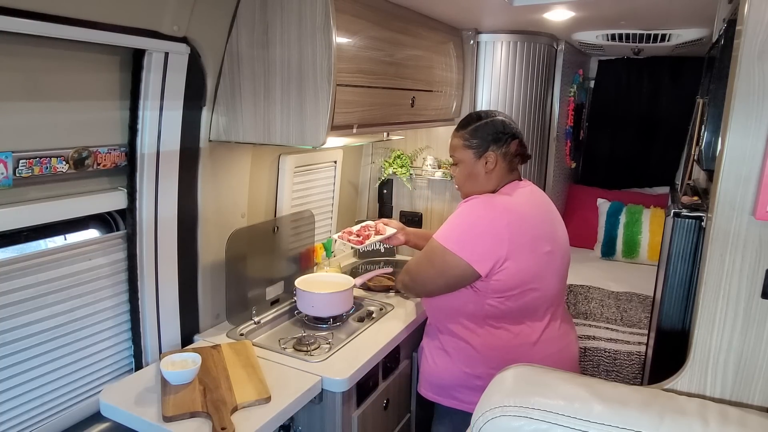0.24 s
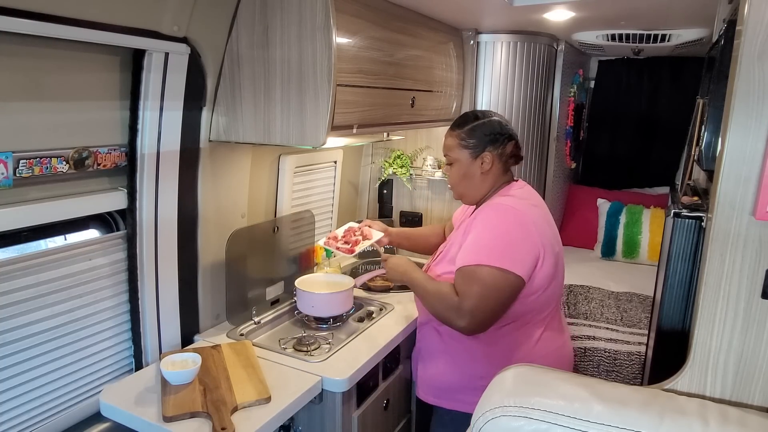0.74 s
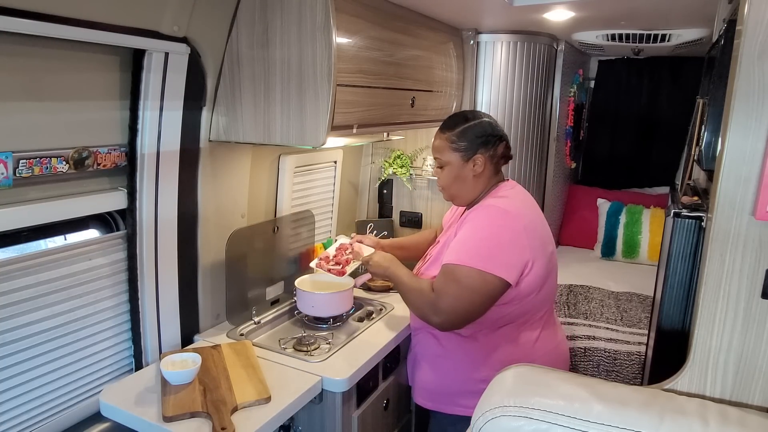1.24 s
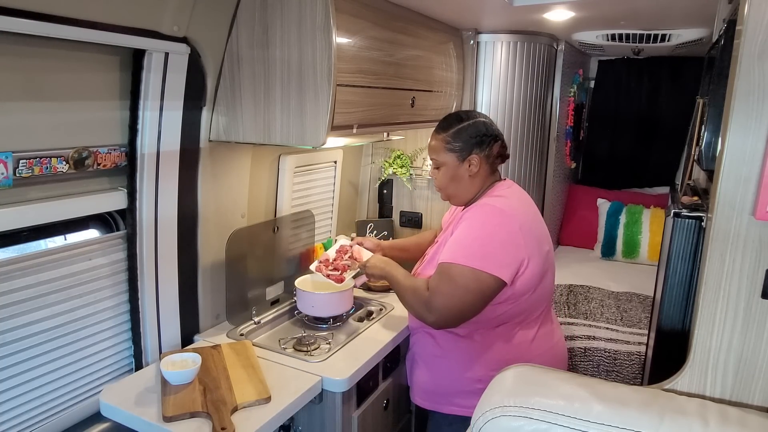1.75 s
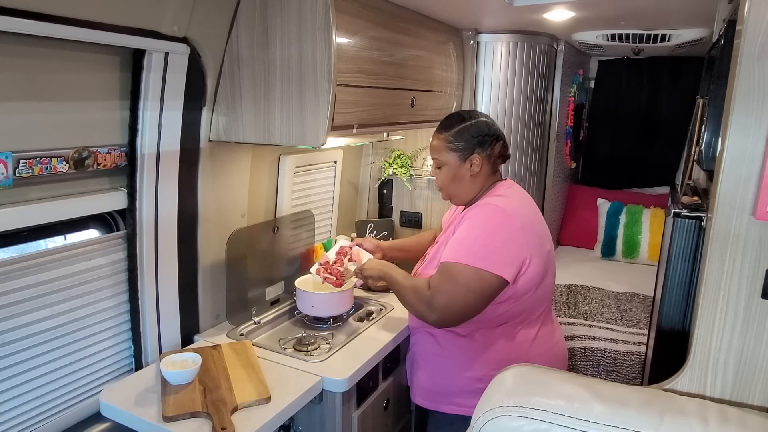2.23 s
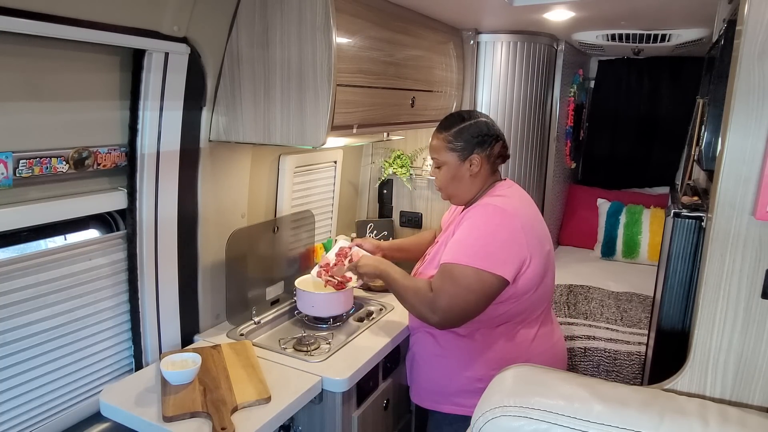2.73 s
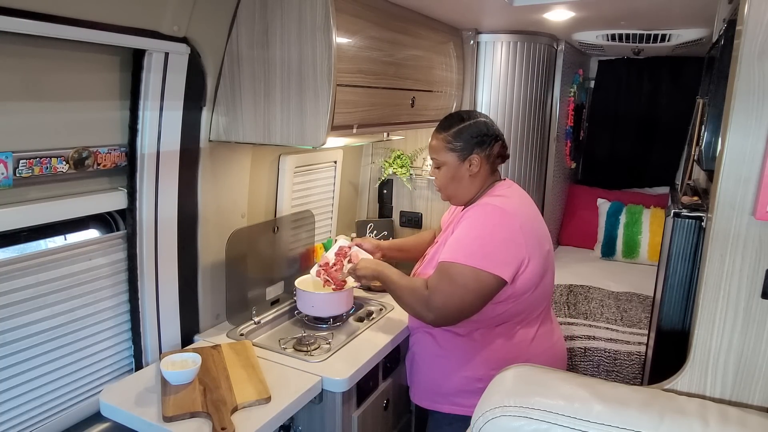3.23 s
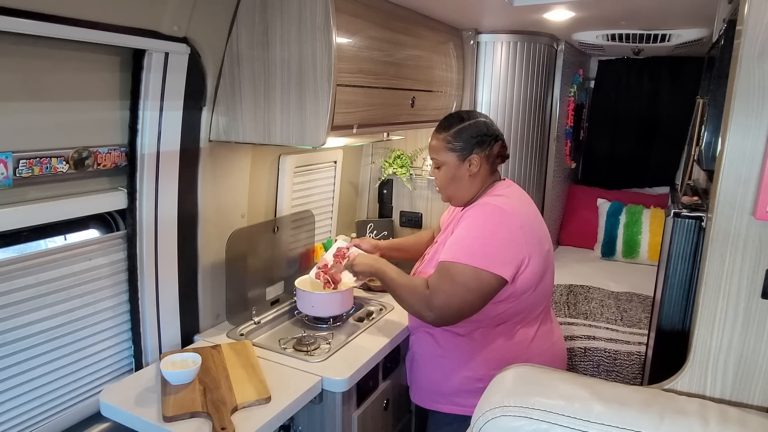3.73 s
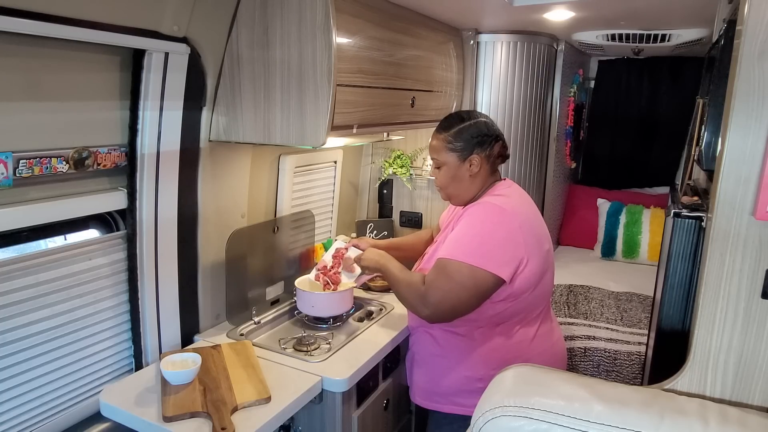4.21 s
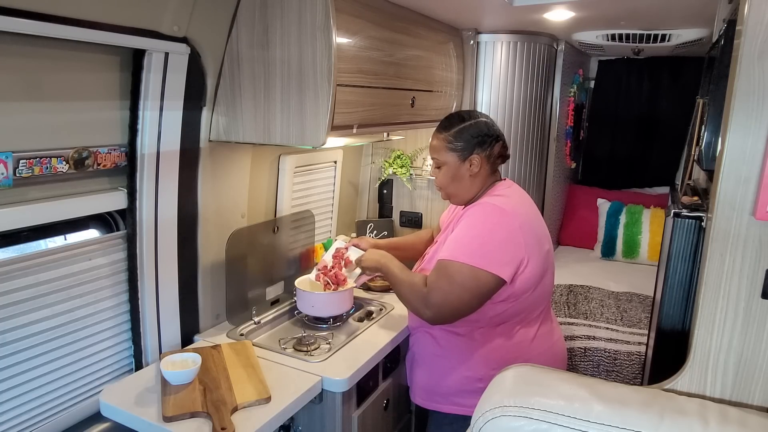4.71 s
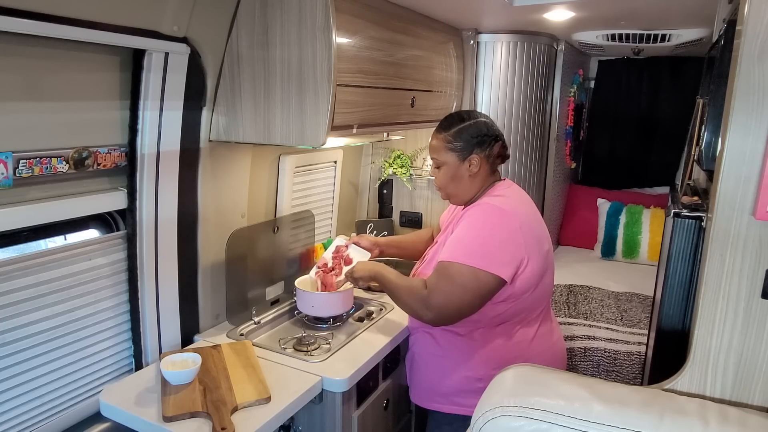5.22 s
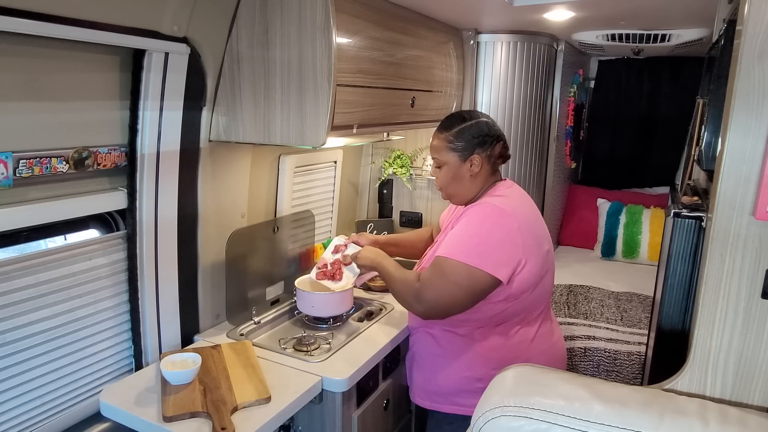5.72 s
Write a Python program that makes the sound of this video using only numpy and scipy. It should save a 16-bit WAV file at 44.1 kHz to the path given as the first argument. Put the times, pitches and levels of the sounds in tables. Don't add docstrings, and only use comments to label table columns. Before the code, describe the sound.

Wooden knocks, crinkling tray film, ringing pan taps and wet meat sliding, close up, with fast faint ticking and a soft low burner hiss.

```python
import sys
import numpy as np
from scipy import signal
from scipy.fft import rfft, irfft
from scipy.io import wavfile

SR = 44100
rng = np.random.default_rng(int(sys.argv[2]) if len(sys.argv) > 2 else 0)


def rack_gain(trim_db):
    fader = np.asarray(trim_db, float)
    return 10 ** (fader / 20)


def dump(signal):
    limited = np.clip(np.atleast_2d(signal).T, -1, 1)
    pcm = np.round(limited * 32767).astype(np.int16)
    wavfile.write(sys.argv[1], SR, pcm)


N = 262836

# frequency in Hz, density in dB per Hz.
BACKGROUND_COLOUR = [(16, -25.5), (28, -4.5), (70, -2), (92, -12.5), (118, -36), (230, -24.5), (400, -21),
                     (560, -28.5), (900, -28.5), (2300, -31.5), (4400, -29.5), (6300, -39), (9500, -39), (13000, -33.5),
        (16000, -38)]
# time in seconds, level in dB.
FLAME_SWELL = [(0, 1), (.9, 0.5), (1.4, 1.5), (1.9, -1.5), (2.3, -2.5), (3.5, -0.5), (4.1, 0), (4.7, 0),
               (5.96, 1.5)]
# frequency in Hz, likeness from -1 to 1.
LIKENESS = [(60, .85), (130, .7), (290, -.16), (640, -.3), (1410, -.2), (3100, -.13), (7000, 0)]
# frequency in Hz, left minus right in dB.
MIC_LEAN = [(60, -3.5), (180, -2.5), (550, -2.5), (1650, -0.5), (4970, -0.5), (15000, 4.5)]
# frequency in Hz, t60 in seconds.
GALLEY_T60 = [(100, 0.26), (500, 0.19), (2000, 0.11), (6000, 0.098), (14000, 0.08)]

# start in seconds, peak in dB, then relative to it bright crack in dB,
# low panel in dB, high panel in dB.
KNOCKS = [
    (0.0, -31, -7, -19.5, -20.5),
    (0.103, -45.5, -36, 0, -6.5),
    (0.112, -38.5, -29.5, -17, -29),
    (0.257, -64.5, -24.5, -3.5, -29),
    (0.386, -9.5, -44.5, -25, -25.5),
]
# frequency in Hz, level in dB, t60 in seconds.
WORKTOP_MODES = [(1045, -14, .07), (2169, -4, .07), (2290, -8, .06), (2616, -9, .06), (3000, -3, .06),
                 (3400, -8, .05), (3740, -6, .07), (4440, -14, .05), (6130, -18, .03)]
# frequency in Hz, level in dB, t60 in seconds.
LOW_PANEL_MODES = [(1370, 0, .1), (1410, -3, .08), (1437, -4, .1)]
# frequency in Hz, level in dB, t60 in seconds.
HIGH_PANEL_MODES = [(1963, 0, .14)]
# start in seconds, board in dB, boom in dB.
THUDS = [
    (0.001, -32.5, -37.5),
    (0.059, -39, -81.5),
    (0.113, -48, -74),
    (0.389, -21, -27),
]
# frequency in Hz, level in dB, t60 in seconds.
BOARD_MODES = [(179.7, -11, 0.34), (197.8, -3, 0.22), (233.4, -7.5, 0.17), (299, -25.5, 0.27),
               (389, -15, .15)]
# frequency in Hz, level in dB, t60 in seconds.
CUPBOARD_MODES = [(87.2, 0, 0.4)]
# start in seconds, level in dB, frequency in Hz, t60 in seconds.
FAVOURED_MODES = [(0.001, -41, 1080, 0.021), (0.001, -40, 6040, 0.035), (0.001, -41.5, 1966, 0.081),
                  (.001, -34, 1396, 0.032), (0.102, -41, 1060, 0.063), (0.387, -31, 5370, .06),
                  (.387, -26, 2126, 0.067), (.387, -26, 3037, .06), (.43, -41, 950, 0.12),
                  (2.401, -27, 3430, 0.069), (2.401, -22, 3289, 0.064), (2.401, -26.5, 3750, 0.054),
                  (2.401, -25, 2050, 0.061), (2.401, -34.5, 2310, 0.25), (2.528, -34, 3390, 0.096),
                  (2.528, -32, 1014, .08), (2.643, -47, 1773, 0.096), (3.014, -34, 1071, .09),
                  (3.014, -41, 1550, .08), (3.303, -28.5, 1050, .07), (3.303, -40, 2100, 0.089),
                  (3.727, -40, 5280, 0.087), (3.763, -47, 1780, .12), (3.763, -38.5, 585, .08),
                  (4.214, -48, 1050, .05), (4.311, -27.5, 1825, .12), (4.311, -36.5, 1163, .15),
                  (4.311, -23, 2050, 0.092), (4.447, -38.5, 1000, 0.059), (4.447, -29.5, 1974, 0.12),
                  (4.447, -25, 2555, 0.078), (4.447, -28, 3370, .06), (4.794, -40, 3000, 0.049),
                  (4.793, -52, 1760, .1), (4.896, -45.5, 3050, 0.046), (4.896, -50, 1800, 0.074),
                  (4.972, -48, 640, .08), (4.995, -34, 5560, 0.036), (5.25, -51, 1940, .08),
                  (5.25, -43, 2550, 0.065), (5.41, -55, 1800, .12), (5.583, -53, 1760, 0.059),
                  (5.74, -53.5, 640, 0.092), (5.825, -39, 1410, 0.11), (5.825, -41, 3285, 0.08),
                  (5.826, -51, 766, 0.16), (5.826, -39.5, 1037, 0.047), (5.826, -37, 1770, .06),
                  (5.826, -44.5, 2225, 0.051)]

# ms after the main tick, level in dB, frequency in Hz, width in Hz.
CONTACTS = [
    (-40, -22, 11500, 1400),
    (-14, -14, 11700, 1500),
    (-7, -14, 11700, 1500),
    (0, 0, 11900, 1800),
    (14, -13, 12000, 1600),
    (39, -2, 11600, 1400),
    (44, -4, 11500, 1300),
    (53, -3, 11600, 1300),
    (67, -8, 11600, 900),
    (78, -12, 11620, 500),
]
# frequency in Hz, level in dB, t60 in seconds.
ESCAPEMENT_MODES = [(11000, -5.5, .03), (11290, -7.5, .04), (11350, 0.5, 0.08), (12200, 0.5, .07),
                    (11740, -2.5, .05), (11500, -1, .05), (11600, -5, .035), (12500, -2, .03)]

# time in seconds, level in dB.
CRINKLE = [
    [(0.28, -73), (0.356, -58.5), (0.482, -55.5), (0.598, -64.5), (0.78, -78)],
    [(3.688, -63), (3.75, -63), (3.8, -71), (3.86, -79)],
    [(5.246, -53.5), (5.32, -60), (5.35, -53), (5.41, -53.5), (5.47, -62.5), (5.55, -74)],
]
# frequency in Hz, density in dB per Hz.
CRINKLE_COLOUR = [(590, -32.5), (1000, -19), (1140, -1.5), (1770, -4.5), (9490, -10), (11600, -10.5),
                  (16000, -19)]
# start in seconds, peak in dB, frequency in Hz, length in seconds.
SNAPS = [(0.526, -45, 7600, 0.0057), (1.524, -64, 7500, 0.021), (3.7005, -39, 7900, 0.0094),
         (3.747, -37.5, 8200, 0.0099), (3.746, -46, 13700, 0.011), (3.758, -25.5, 677, 0.003),
         (3.788, -43, 12870, 0.0038), (4.083, -60, 7600, 0.004), (4.116, -61, 3200, 0.02),
         (5.313, -37.5, 11300, 0.0071), (5.3655, -32.5, 3300, 0.0049), (5.395, -37, 13600, 0.0054)]
# start in seconds, peak in dB, frequency in Hz, length in seconds.
SQUEAKS = [(0.5331, -56.5, 990, 0.023), (3.7079, -30, 2150, 0.0043), (3.7273, -41.5, 5100, 0.012),
           (3.7321, -31.5, 1450, 0.0039), (3.7869, -39, 3150, 0.0055), (3.7872, -32.5, 2470, 0.0057),
           (5.2951, -46.5, 7720, 0.023), (5.3661, -49, 1300, 0.0048), (5.3944, -29.5, 7690, 0.0032),
           (5.3951, -22.5, 5230, 0.0023), (5.4551, -40.5, 3090, 0.0047)]
# peak in dB, frequency in Hz, width in Hz, length in seconds.
POP = [
    (-36.5, 490, 270, 0.0038),
    (-36.5, 1770, 2800, 0.018),
    (-20.5, 3090, 5140, 0.0022),
    (-34, 10000, 9800, 0.011),
]
# start in seconds, peak in dB, frequency in Hz, length
# in seconds.
TRAY_RUSTLE = [(0.527, -47.5, 4170, 0.0085), (0.825, -37, 4280, 0.0024), (0.829, -34, 900, 0.0033),
               (0.83, -36, 4000, 0.0056), (0.837, -45, 1350, 0.0064), (0.874, -60, 512, 0.016),
               (3.688, -51, 7850, .01), (3.691, -57, 2200, .01), (3.7, -46, 5300, .004),
               (3.708, -44, 3500, 0.0087), (3.732, -39, 2440, 0.0066), (3.763, -44, 5240, 0.0075),
               (3.765, -57, 1700, .015), (5.283, -54, 5400, .015), (5.272, -49, 9300, 0.0076),
               (5.45, -51, 7240, 0.0038), (5.825, -50, 5440, 0.0027)]

# start in seconds, end in seconds, level in dB, frequency in Hz.
WHISTLE = [
    (.921, .981, -77, 3365),
    (.931, 1.451, -73, 3427),
    (1.251, 1.431, -69.5, 3365),
    (2.362, 2.981, -71.5, 3427),
    (2.363, 2.981, -72, 3365),
    (4.201, 4.501, -77.5, 3427),
    (4.202, 4.501, -78, 3365),
    (5.779, 5.895, -78.5, 3427),
    (5.78, 5.895, -78.5, 3365),
]

# start in seconds, peak in dB, then relative to it low modes in dB,
# high modes in dB, bright crack in dB.
TAPS = [(2.4002, -7, -8.5, -6, -19), (2.5273, -24.5, 9.5, -13, -31), (2.5429, -23.5, -15, -9, -24.5),
        (2.5659, -31, 7, -15, -26), (2.5878, -34, -0.5, -9, -24), (3.008, -23, 0.5, -7, -17),
        (3.3027, -16, -3.5, -6.5, -20.5), (3.7482, -38.5, 7.5, -3, -18), (3.763, -56, 2, -16, -24),
        (3.7852, -38.5, 6.5, -14, -5), (3.903, -47, -11.5, -7, -17), (4.1871, -39, 3.5, -1.5, -12.5),
        (4.2786, -14.5, -11, -5.5, -14), (4.3099, -9, -4.5, -7.5, -14), (4.345, -22.5, -5.5, -5, -16),
        (4.4454, -12, -5.5, -5, -15.5), (4.792, -37, -4, -9, -13.5), (4.8959, -37.5, -0.5, -11, -17),
        (4.995, -18, -5, -5, -13.5), (5.249, -35, -1.5, -6, -15.5), (5.4082, -41, -0.5, 1, -16),
        (5.468, -35.5, 1.5, -24, -14), (5.584, -48, -3, -27, -31), (5.825, -30.5, -7.5, -12, -26)]
# frequency in Hz, level in dB, t60 in seconds.
PAN_LOW_MODES = [(690, -6, 0.057), (787.4, -7.5, 0.086), (900, -6.5, 0.033), (1022, 2, 0.068),
                 (1169, 5, 0.089), (1268, -2, 0.083), (1422, 0, 0.051)]
# frequency in Hz, level in dB, t60 in seconds.
PAN_MIDDLE_MODES = [(1570, -5.5, 0.054), (1700, -6, 0.084), (1860, -7, 0.045), (1977, -4, 0.062),
                    (2092, 3, 0.072), (2202, -6.5, .07), (2300, -6, 0.038), (2555, 0.5, 0.063),
                    (2720, -14.5, 0.041)]
# frequency in Hz, level in dB, t60 in seconds.
PAN_HIGH_MODES = [(2800, -7.5, 0.02), (3040, -4, 0.056), (3300, 5, 0.052), (3380, -4, 0.098),
                  (3550, -5.5, 0.094), (3810, -3.5, 0.051)]
# frequency in Hz, level in dB, t60 in seconds.
UPPER_WALL_MODES = [(4150, -2, .07), (4390, -2, .07), (4800, -5, .06), (5120, -8, .05), (5490, -4, .05),
                    (6060, -4, .045), (6520, -8, .04), (8760, -10, .04)]
# start in seconds, rim ring in dB, wall ring in dB, hob thump in dB, meat slap in dB.
RINGS = [(2.401, -25.5, -16, -43.5, -40.5), (2.528, -21, -17, -29.5, -47.5), (3.01, -40.5, -23.5, -46, -58),
         (3.304, -32.5, -31, -38.5, -61.5), (3.748, -25.5, -34.5, -71.5, -51.5), (4.19, -51, -41, -57, -48),
         (4.28, -40, -16.5, -37.5, -45.5), (4.31, -21.5, -38, -29.5, -53), (4.447, -29, -33.5, -30.5, -47),
         (4.792, -53, -46, -63, -48), (4.897, -58, -53, -58, -52), (4.993, -49, -14, -38, -43.5),
         (5.249, -51, -37.5, -50.5, -47.5), (5.31, -36, -62, -69, -81), (5.408, -63.5, -42.5, -69.5, -52.5),
         (5.825, -44.5, -57, -48, -53)]
# frequency in Hz, level in dB, t60 in seconds.
RIM_MODES = [(578, 0, .11)]
# frequency in Hz, level in dB, t60 in seconds.
WALL_MODES = [(1775, -4, .12)]
# frequency in Hz, level in dB, t60 in seconds.
RIM_HUM_MODES = [(576, 0, .6)]
# frequency in Hz, level in dB, t60 in seconds.
WALL_HUM_MODES = [(1742, 0, .6)]
# start in seconds, level in dB.
RIM_FREE = [
    (3.748, -38),
    (4.312, -35),
    (4.447, -73.5),
    (4.995, -39.5),
    (5.467, -59.5),
]
# start in seconds, level in dB.
WALL_FREE = [
    (2.528, -52.5),
    (3.014, -57),
    (3.303, -56),
]
# frequency in Hz, level in dB, t60 in seconds.
HOB_MODES = [(67, -1.5, 0.22), (161.5, -2, 0.21), (170, -7, 0.23), (217.7, -6, 0.17)]

# time in seconds, level in dB.
SLIDING = [
    [(2.53, -54), (2.6, -61), (2.64, -68), (2.68, -67), (2.78, -79)],
    [(3.74, -66), (3.83, -62.5), (3.89, -76), (3.91, -64), (4.0, -75)],
    [(4.78, -66), (4.81, -63), (4.98, -63.5), (5.1, -65), (5.2, -78), (5.26, -66), (5.5, -67.5),
     (5.62, -73), (5.68, -66), (5.8, -75)],
]
# frequency in Hz, level in dB, t60 in seconds.
LOADED_PAN_MODES = [(210.4, -14, .1), (331, -17.5, 0.045), (594, -15.5, .09), (790, -11.5, 0.076),
                    (1380, -16, 0.054), (1800, -11.5, 0.067), (2150, -17, 0.034)]
# start in seconds, peak in dB, frequency in Hz.
ROCKS = [(2.6436, -45, 1030), (2.736, -55.5, 1030), (3.0782, -45, 1104), (3.826, -42, 1026),
         (3.9, -44.5, 1076), (3.942, -54.5, 1030), (4.256, -43.5, 1150), (4.548, -56, 1094),
         (4.797, -51, 1160), (4.815, -45.5, 1104), (4.853, -47.5, 1120), (4.899, -53, 1160),
         (4.927, -47, 1140), (4.967, -41.5, 1154), (5.0665, -43, 1070), (5.1151, -49, 1084),
         (5.168, -63, 1070), (5.252, -52, 1140), (5.3046, -39.5, 1085), (5.313, -41, 1224),
         (5.327, -65, 1150), (5.409, -57, 1170), (5.446, -41.5, 1090), (5.467, -38, 1234),
         (5.492, -58, 1240), (5.55, -52, 1066), (5.583, -68, 1160), (5.652, -46.5, 1100),
         (5.69, -54.5, 1095), (5.728, -52, 1080), (5.793, -61, 1080)]


def rms_one(x):
    return x / np.sqrt(np.mean(x ** 2) + 1e-20)


def at_hz(points, hz):
    table_hz, value = np.transpose(points)
    return np.interp(np.log(hz), np.log(table_hz), value)


def level(rows):
    s, db = np.transpose(rows)
    return rack_gain(np.interp(np.arange(N) / SR, s, db, left=-200, right=-200))


def band(x, low_hz, high_hz):
    sos = signal.butter(2, [low_hz, min(high_hz, SR * .48)], "band", fs=SR, output="sos")
    return signal.sosfilt(sos, x)


def steep(x, low_hz, high_hz):
    return band(band(x, low_hz, high_hz), low_hz, high_hz)


def add_at(out, s, sound):
    out[round(s * SR):][:len(sound)] += sound


def ring(clicks, hz, t60):
    r, w = rack_gain(-60 / (t60 * SR)), 2 * np.pi * hz / SR
    return signal.lfilter([0, np.sin(w)], [1, -2 * r * np.cos(w), r * r], clicks + 1e-18)


def clicks_at(times, db):
    out = np.zeros(N)
    index = np.round(np.asarray(times) * SR).astype(int)
    np.add.at(out, np.clip(index, 0, N - 1), rack_gain(db))
    return out


def struck(modes, times, db, scatter_db, detune, swell_s):
    hz, mode_db, t60 = np.transpose(modes)
    out = np.zeros(N + SR)
    t = np.arange(min(SR, int(t60.max() * SR)))[:, None] / SR
    chances = rng.standard_normal((len(times), 2, len(modes)))
    for s, blow_db, (strength, pitch) in zip(times, db, chances):
        fade = rack_gain(blow_db + mode_db + scatter_db * strength - 60 * t / t60) * (1 - np.exp(-t / swell_s))
        tones = np.sin(2 * np.pi * hz * (1 + detune * pitch) * t)
        add_at(out, s, np.sum(fade * tones, axis=1))
    return out[:N]


def crack(times, db, length_s):
    fade = np.exp(-1 / (length_s * SR))
    return signal.lfilter([1], [1, -fade], clicks_at(times, db) + 1e-18) * rng.standard_normal(N)


def bursts(rows):
    out, t = np.zeros(N), np.arange(SR // 10) / SR
    for s, db, hz, width_hz, length_s in rows:
        burst = band(rng.standard_normal(len(t)), max(hz - width_hz / 2, 200), hz + width_hz / 2)
        room_left = N - round(s * SR)
        add_at(out, s, (rack_gain(db) * rms_one(burst) * np.exp(-t / length_s))[:room_left])
    return out


def resonant(rows, share):
    return [(s, db, hz, share * hz, length_s) for s, db, hz, length_s in rows]


def grains(per_s, spread_db, most):
    touching = rng.random(N) < per_s / SR
    strength = rack_gain(spread_db * np.minimum(rng.exponential(1, N), most))
    return touching * strength * rng.choice([-1, 1], N)


def diffuse(gain_at, count):
    out, edges = 0, 17 * 2 ** np.arange(0, 10.6, .4)
    white = rng.standard_normal((2, 2, count))
    for k, (low, high) in enumerate(zip(edges, edges[1:])):
        mid, side = band(white[k % 2], low, high)
        hz = np.sqrt(low * high)
        alike = np.clip(at_hz(LIKENESS, hz), -1, 1)
        lean = rack_gain(at_hz(MIC_LEAN, hz) * np.array([[.5], [-.5]]))
        pair = np.sqrt(1 + alike) * mid + np.sqrt(1 - alike) * side * [[1], [-1]]
        out = out + gain_at(hz) * lean * pair
    return out


def galley(x, direct_db, left_db, right_lag_ms):
    t = np.arange(SR // 3) / SR
    tail = diffuse(lambda hz: rack_gain(-60 * t / at_hz(GALLEY_T60, hz)), count=len(t))
    tail = tail * np.minimum(t / 0.0036, 1)
    response = tail / np.sqrt(np.sum(tail ** 2) / 2)
    response[0, 0] += rack_gain(direct_db + left_db / 2)
    lag = np.round(right_lag_ms * SR / 1000)
    response[1] += rack_gain(direct_db - left_db / 2) * np.maximum(1 - abs(t * SR - lag), 0)
    return signal.fftconvolve(x[None], response, axes=1)[:, :N]


def worktop():
    s, db, bright, low, high = np.transpose(KNOCKS)
    wood = struck(WORKTOP_MODES, s, db - 12.0, scatter_db=2.0, detune=0.0049, swell_s=0.00011)
    wood += band(crack(s, db + 8.5, 0.0024), 1300, 3960)
    wood += band(crack(s, db - 8.0, 0.018), 450, 3200)
    panels = struck(LOW_PANEL_MODES, s, db + low + 6.0, scatter_db=-2.5, detune=0.0021, swell_s=0.00036)
    panels += struck(HIGH_PANEL_MODES, s, db + high + 8, scatter_db=0, detune=.001, swell_s=.001)
    edge = ring(clicks_at(s, db - 24.0), 579.8, 0.15)
    drop_back = ring(clicks_at([.533], -48.0), 1097, 0.22)
    return wood + edge + drop_back + panels + band(crack(s, db + bright + 3.5, 0.0011), 3800, 9000)


def background():
    settle = SR // 2
    noise = diffuse(lambda hz: rack_gain(at_hz(BACKGROUND_COLOUR, hz)), count=N + settle)
    noise = rms_one(noise[:, settle:])
    return rack_gain(-58) * (noise + (level(FLAME_SWELL) - 1) * band(noise, 130, 6900))


def thumps():
    s, board, boom = np.transpose(THUDS)
    cupboard = struck(BOARD_MODES, s, board, scatter_db=4.0, detune=0.0024, swell_s=0.0061)
    boom = struck(CUPBOARD_MODES, s, boom, scatter_db=1.5, detune=0.0022, swell_s=0.0053)
    s, _, _, thump, _ = np.transpose(RINGS)
    hob = struck(HOB_MODES, s + 0.01887, thump + 0.82, scatter_db=4.5, detune=0.022, swell_s=0.025)
    low = cupboard + hob
    later = np.roll(low, SR // 5000)
    return rack_gain([[-1.2], [1.2]]) * boom + np.array([low, later])


def favoured():
    out, t = np.zeros(N + SR), np.arange(SR // 3) / SR
    for s, db, hz, t60 in FAVOURED_MODES:
        add_at(out, s, rack_gain(db - 60 * t / t60) * np.sin(2 * np.pi * hz * t))
    return out[:N]


def clockwork():
    first_tick_s, cycle_s = .138, .16048
    s = np.arange(first_tick_s - cycle_s, N / SR, cycle_s)
    db = -43 + 1 * rng.standard_normal(len(s))
    ticks = 0
    for ms, contact_db, hz, width_hz in CONTACTS:
        at = s + ms / 1000
        heard = (at > 0) & (at < N / SR)
        clicks = clicks_at(at[heard], (db + contact_db + 35.0)[heard])
        ticks = ticks + steep(clicks, hz - width_hz / 2, hz + width_hz / 2)
    touches = np.concatenate([s, s + .039, s + .053])
    heard = (touches > 0) & (touches < N / SR)
    touch_db = np.tile(db, 3)[heard] - 17.5
    ringing = struck(ESCAPEMENT_MODES, touches[heard], touch_db, scatter_db=3.5, detune=.0008, swell_s=.0004)
    return rack_gain(-3.5) * ticks + ringing


def tray():
    pop_s = .8176
    pop = [(pop_s, *part) for part in POP]
    foam = bursts(pop + resonant(SNAPS, 0.31) + resonant(SQUEAKS, 0.13))
    hz = np.maximum(np.fft.rfftfreq(N, 1 / SR), 1)
    crinkles = grains(per_s=2500, spread_db=0.96, most=5)
    film = rms_one(irfft(rfft(crinkles) * rack_gain(at_hz(CRINKLE_COLOUR, hz)), N))
    return foam + film * sum(level(rows) for rows in CRINKLE)


def rustle_and_upper_wall():
    s, db, _, _, bright = np.transpose(TAPS)
    wall = struck(UPPER_WALL_MODES, s, db + bright - 7.0, scatter_db=3.5, detune=.025, swell_s=.0005)
    return wall + bursts(resonant(TRAY_RUSTLE, 0.42))


def burner():
    rise_db_per_s, fall_db_per_s = 59.5, 117
    flicker_db, waver_hz, flickers_per_s = 1.5, 1.7, 15
    t, out = np.arange(N) / SR, 0
    step = t * flickers_per_s
    chances = rng.standard_normal((len(WHISTLE), 2, 200))
    for (start, end, db, hz), (flicker, waver) in zip(WHISTLE, chances):
        db = db - rise_db_per_s * np.maximum(start - t, 0) - fall_db_per_s * np.maximum(t - end, 0)
        db = db + flicker_db * np.interp(step, np.arange(len(flicker)), flicker)
        pitch = hz + waver_hz * np.interp(step, np.arange(len(waver)), waver)
        out = out + rack_gain(db) * np.sin(2 * np.pi * np.cumsum(pitch) / SR)
    return out


def pan():
    bounce_s, loss_db, duller_db = 0.0084, 15.5, 10.5
    again = [(s + bounce_s, db - loss_db, low, high, bright - duller_db) for s, db, low, high, bright in TAPS]
    s, db, low, high, bright = np.transpose(TAPS + again)
    out = steep(crack(s, db + bright + 7.5, 0.0025), 3600, 8780)
    groups = [(PAN_LOW_MODES, low, 750, 1400), (PAN_MIDDLE_MODES, 0, 1500, 2800),
              (PAN_HIGH_MODES, high, 2800, 4100)]
    for modes, share, low_hz, high_hz in groups:
        out += struck(modes, s, db + share - 10, scatter_db=3.0, detune=0.0034, swell_s=0.001)
        out += steep(crack(s, db + share + 9.5, 0.0035), low_hz, high_hz)
    s, rim, wall, _, slap = np.transpose(RINGS)
    rim_s, rim_hum = np.transpose(RIM_FREE)
    wall_s, wall_hum = np.transpose(WALL_FREE)
    rings = [(RIM_MODES, s, rim - 6.5), (WALL_MODES, s, wall + 4),
             (RIM_HUM_MODES, rim_s, rim_hum - 8), (WALL_HUM_MODES, wall_s, wall_hum)]
    for modes, at, ring_db in rings:
        out += struck(modes, at, ring_db, scatter_db=0, detune=.001, swell_s=.004)
    return out + steep(crack(s + 0.0022, slap + 18, 0.03), 172, 435)


def sliding():
    touches = grains(per_s=500, spread_db=2.9, most=4)
    body = sum(rack_gain(db) * ring(touches, hz, t60 * 0.53) for hz, db, t60 in LOADED_PAN_MODES)
    body = body + rack_gain(-4.0) * band(touches, 250, 3500)
    return rms_one(body) * sum(level(rows) for rows in SLIDING)


def rocking():
    t60_s, rise_per_s, swell_s = 0.035, 7.9, .0012
    s, db, _ = np.transpose(ROCKS)
    plops, t = np.zeros(N + SR), np.arange(SR // 16) / SR
    for at, plop_db, hz in ROCKS:
        fade = rack_gain(plop_db + 7.0 - 60 * t / t60_s) * (1 - np.exp(-t / swell_s))
        add_at(plops, at, fade * np.sin(2 * np.pi * hz * 0.983 * (t + rise_per_s * t ** 2 / 2)))
    grit = steep(crack(s, db + 6.0, 0.0042), 592, 3430)
    answer = struck(LOADED_PAN_MODES, s, db + 1.5, scatter_db=2.0, detune=0.027, swell_s=.003)
    return plops[:N] + grit + answer


def scene():
    hob = galley(pan() + favoured() + tray() + burner(), direct_db=-6.5, left_db=17.0, right_lag_ms=.16)
    grate = galley(rocking(), direct_db=2.5, left_db=3.0, right_lag_ms=0.17)
    board = galley(worktop(), direct_db=-10.5, left_db=21.0, right_lag_ms=.11)
    ticking = galley(clockwork(), direct_db=-8.0, left_db=12.5, right_lag_ms=.2)
    near = hob + grate + board + thumps() + ticking + background()
    return near + galley(rustle_and_upper_wall() + sliding(), direct_db=-0.5, left_db=1.5, right_lag_ms=.13)


def roll_off(x):
    return signal.sosfilt(signal.butter(12, 16000, fs=SR, output="sos"), x)


def record(dry):
    t = np.arange(SR // 30) / SR
    ghost = band(rng.standard_normal(len(t)) * np.exp(-t / 0.0047), 810, 18000)[None, ::-1]
    ghost = ghost / np.sqrt(np.sum(ghost ** 2))
    ahead = signal.fftconvolve(dry, ghost, axes=1)[:, -N:]
    top_cut = signal.ellip(12, .5, 75, 15940, fs=SR, output="sos")
    mix = signal.sosfilt(top_cut, dry + rack_gain(-19) * ahead)
    return roll_off(mix)


dry = scene()
out = record(dry)
dump(out)
```